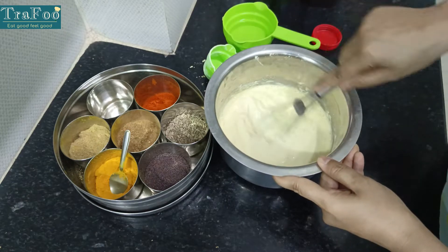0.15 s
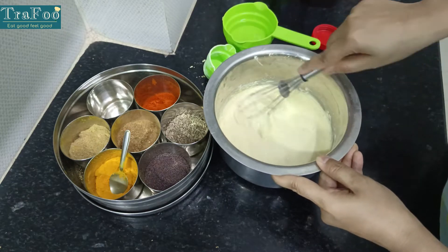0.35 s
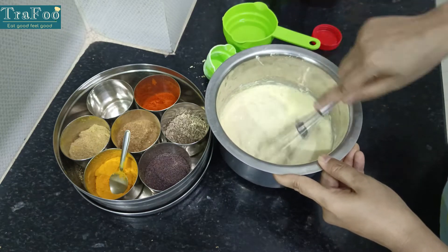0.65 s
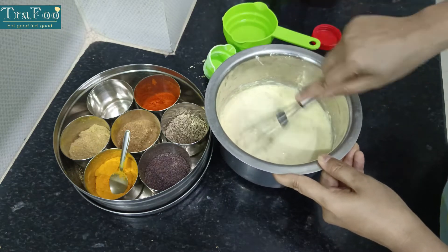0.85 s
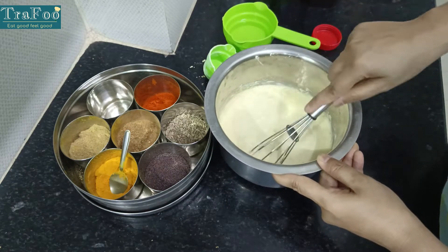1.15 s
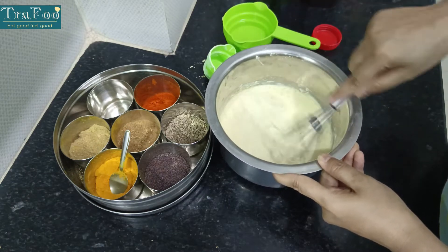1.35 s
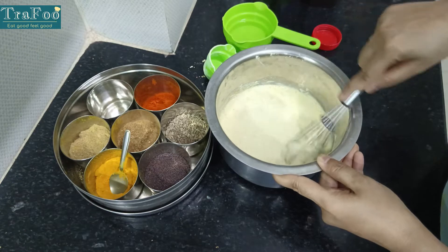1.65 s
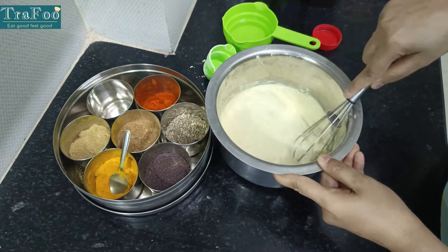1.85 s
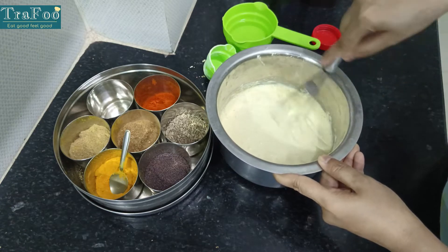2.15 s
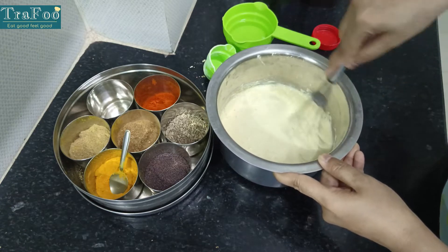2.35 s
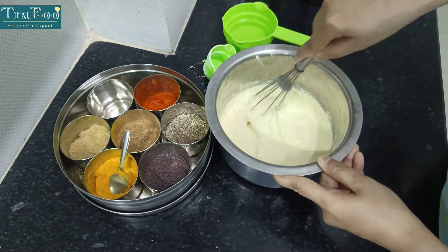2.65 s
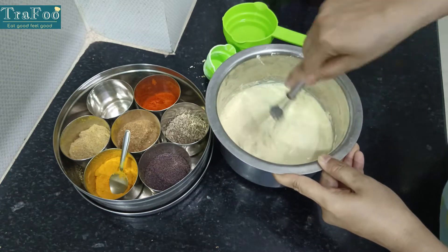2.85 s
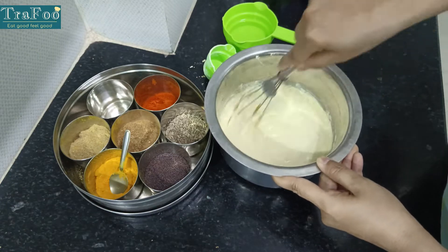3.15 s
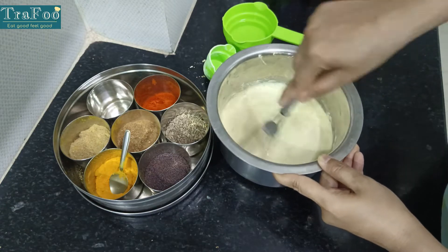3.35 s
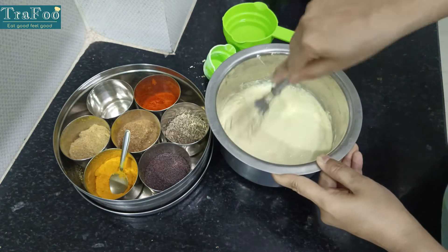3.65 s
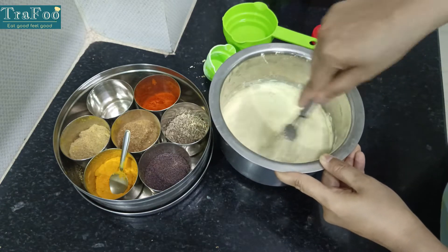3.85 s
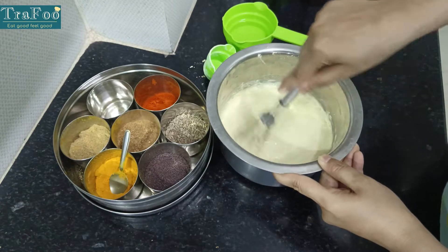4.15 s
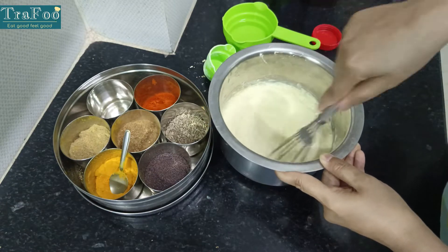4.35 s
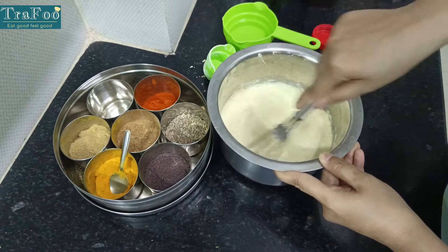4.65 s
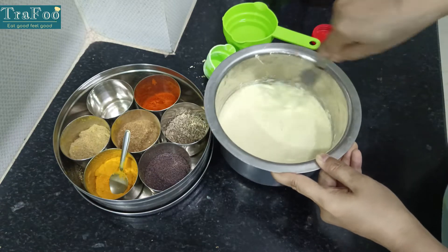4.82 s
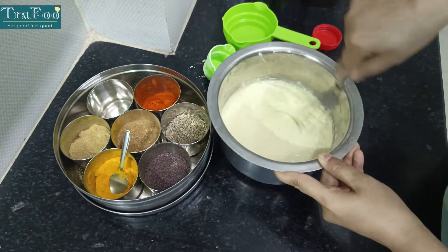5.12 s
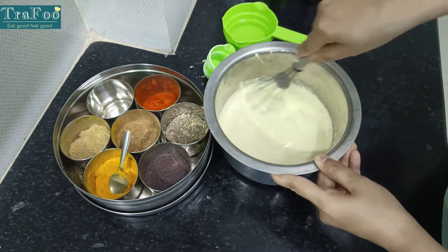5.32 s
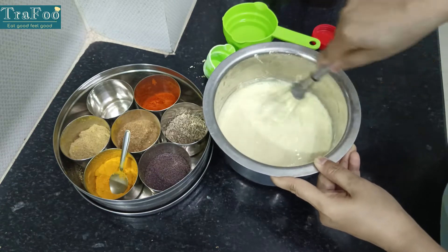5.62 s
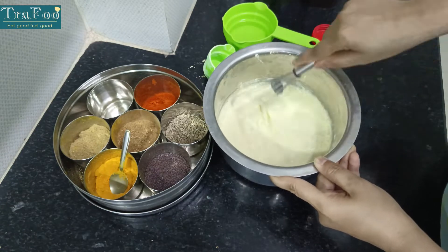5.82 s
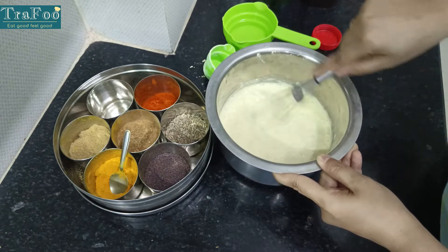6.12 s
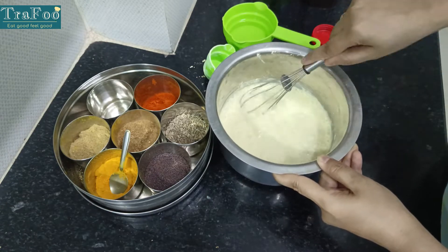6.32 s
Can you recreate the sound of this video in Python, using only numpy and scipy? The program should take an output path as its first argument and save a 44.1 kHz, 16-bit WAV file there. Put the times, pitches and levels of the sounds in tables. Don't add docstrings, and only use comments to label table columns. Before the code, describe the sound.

Close up in a small kitchen, a wire whisk beats batter in a hand-held steel bowl. Quick scraping strokes come several times a second, dotted with short metallic clacks and pings. From about two seconds, wet slaps and low thumps of the rocking bowl join in, and the beating grows firmer and busier through to the end, over very quiet room tone.

```python
import sys
import numpy as np
from scipy import signal
from scipy.fft import rfft, irfft, next_fast_len
from scipy.io import wavfile
from scipy.ndimage import uniform_filter1d, map_coordinates

SR = 44100
rng = np.random.default_rng(int(sys.argv[2]) if len(sys.argv) > 2 else 0)


def voltage_ratio(level):
    return 10 ** (np.asarray(level, float) / 20)


def waveform_to_disk(signal):
    frames = np.transpose(np.atleast_2d(signal))
    scaled = np.clip(frames, -1, 1) * 32767
    samples = np.round(scaled).astype(np.int16)
    wavfile.write(sys.argv[1], SR, samples)


N = 285768

# turn_s, drag_at_turn_db, drag_at_full_speed_db
STROKES = [(0.0, -38.5, -45), (0.072, -62, -43.5), (0.192, -44, -42.5), (0.317, -49.5, -39),
           (0.451, -47, -37), (0.688, -49, -40), (0.79, -58, -33), (0.906, -56, -33),
           (0.966, -42, -39.5), (1.153, -59, -40), (1.242, -55, -40), (1.387, -50, -43.5),
           (1.488, -47, -34.5), (1.652, -70, -43), (1.72, -44, -38.5), (1.879, -71, -41),
           (1.949, -49, -38), (2.106, -49.5, -39), (2.312, -46.5, -38.5), (2.439, -50, -35),
           (2.599, -40, -44), (2.676, -57, -42), (2.768, -38, -31.5), (2.833, -33.5, -40.5),
           (2.929, -68, -40.5), (3.067, -33.5, -39), (3.213, -59, -46),
           (3.332, -35, -46), (3.417, -47, -36.5), (3.48, -48, -39), (3.533, -39, -43.5),
                 (3.724, -60, -36.5), (3.975, -52, -46.5), (4.067, -39, -36.5), (4.179, -48, -39),
                 (4.246, -58, -40), (4.33, -43.5, -37), (4.453, -41, -36.5), (4.59, -43, -39),
                 (4.748, -44, -38.5), (4.909, -40.5, -37.5), (4.958, -39, -41), (5.084, -57, -35.5),
                 (5.193, -36, -41.5), (5.341, -63, -41), (5.418, -43, -38), (5.591, -54, -37.5),
                 (5.731, -51, -38.5), (5.825, -43, -35), (5.991, -61, -43.5), (6.077, -54, -38),
                 (6.212, -58, -39), (6.454, -47.5, -32.5)]
STROKE_DEPTH = [2, 1.5, 1, -1.5, 4.5, -10, 7.5, 7.5, 9.5, -5, 3, 3.75, -6, -7, -12, -5, 1, -0.5, -8, -10, 0,
                3, 3, -3, 3.5, -6, 0.5, 1.5, -22, 0.5, 0, -3, 5, -1, -.75, 3.5, 1, 0.5, 2.5, 6, -8, 1.75, 3,
                9.5, 10, 5.5, 7.5, -6, 3.5, 11.5, -4, 3.5, 3.25]
# time_s, brightness_db (wires out of the batter), fullness_db (pressure on the floor)
GRIP = [(0, 26.5, 5), (.45, 17, 2), (.75, -17.5, 6), (1.3, -0.5, 2), (1.9, -6, 9), (2.5, -8, 19.5),
        (3.0, 1, 22.5), (3.45, 8.5, 25.5), (3.9, -24, 27.5), (4.2, -4, 13.5), (4.7, -8.5, 16),
        (5.2, -15, 14), (5.4, 3, 8), (5.65, -13, -17), (5.9, 19, -2), (6.48, -9, -1)]
# freq_hz, density_db_per_hz
DRAG_SPECTRUM = [(350, -80), (600, -64), (789, -17), (930, -53), (996, -10.5), (1100, -10.5), (1290, 4.5),
                 (2630, 8.5), (3020, 7.5), (3550, 10.5), (5660, 7.5), (6150, -1.5), (15800, -20.5)]
# pitch_hz, level_db, t60_s
SINGING_MODES = [(1300, -1.5, 0.051), (1580, -7, 0.068), (1783, 1.5, 0.055), (2244, -7.5, 0.1),
                 (2446, -3, 0.046), (2710, 1.5, 0.058), (3280, 0, 0.064), (3515, -2.5, 0.05),
                 (3697, -7.5, 0.049), (4395, -1.5, 0.055)]
# freq_hz, t60_s
SHELL_DECAY = [(500, 0.57), (2000, 0.039), (5000, 0.081), (16000, 0.013)]
# start_s, peak_db, bare_rim_db, ring_db
KNOCKS = [(0.526, -23, 7, 2), (0.7217, -21.5, -10, -11), (0.975, -10.5, 1.5, 2.5), (1.4267, -23, -3.5, -7),
          (1.6671, -24, -8.5, 2.5), (1.889, -25.5, -6, -13), (2.152, -24.5, 4.5, 9.5), (2.3362, -41, 8, 14),
          (2.3657, -23, 8, -6), (2.5053, -21.5, -0.5, 9), (2.6083, -28, 3.5, 9), (2.7073, -22.5, -5, -2),
          (2.8416, -24.5, 5, 6.5), (2.9653, -24.5, -4.5, 5.5), (3.0981, -25.5, 6, 6),
          (3.2377, -26.5, -3.5, 8), (3.43, -25, 11.5, 10.5), (3.49, -33, -20, 13),
          (3.7704, -15.5, -12.5, 1), (4.2104, -39.5, 8.5, 11), (4.464, -15.5, 2, 5.5),
          (4.7577, -11.5, -0.5, 3), (4.9211, -15.5, 3, -1), (4.9654, -18, 2.5, 7), (5.1007, -26.5, -4, 2),
          (5.2023, -22, -2.5, 0), (5.3571, -21, -11, 4.5), (5.5377, -26.5, 6.5, 8.5), (6.007, -22, -8, -1),
          (6.2448, -16.5, -13, -1)]
# start_s, peak_db
TOUCHES = [(1.5536, -59), (1.615, -35.5), (2.198, -36), (2.265, -28), (2.562, -37), (2.581, -30),
           (3.292, -23.5), (3.394, -45), (3.6587, -31.5), (3.9998, -28), (4.2563, -30), (5.6106, -21.5),
           (5.935, -33), (6.465, -45)]
# start_s, peak_db
BOUNCES = [
    (2.382, -32.5),
    (4.486, -30.5),
    (4.779, -24.5),
]
# pitch_hz, level_db, t60_s
BOWL_MODES = [(1440, -2.5, 0.013), (2350, -42, 0.075), (2704, -10.5, 0.1), (2680, -11.5, 0.2),
              (3410, -14.5, 0.16), (4440, 2.5, 0.025), (4530, -4, 0.064), (4500, -23, 0.089),
              (4850, -19, 0.04), (5970, -40, 0.21)]
# start_s, level_db, lower_modes_db
RIM_BLOWS = [(0.526, -26.5, -10), (0.975, -28.5, 4), (2.366, -33.5, 11.5), (3.43, -35.5, 6.5),
             (4.465, -28.5, -2.5), (4.758, -28, 2)]
# pitch_hz, level_db, t60_s
RIM_MODES = [(2227, -8.5, 0.11), (2370, -7, 0.16), (2740, -9, 0.18), (4380, -1.5, 0.13), (4580, -6, 0.33),
             (4460, -8.5, 0.41), (4530, -4.5, 0.28), (5500, -27, 0.22)]
# start_s, peak_db, pitch_hz
STRUCK_SPOTS = [(0.091, -33, 1600), (0.5142, -38, 1820), (0.5275, -17, 3050), (0.7226, -23, 1350),
                (0.9736, -16, 2630), (1.4257, -31, 2030), (1.5539, -39, 2770), (1.6152, -29.5, 1423),
                (1.666, -26, 1740), (1.818, -24.5, 2470), (1.8915, -29, 1870), (2.0368, -25, 2500),
                (2.1543, -17, 2356), (2.1969, -28, 1710), (2.3251, -41, 2150), (2.3644, -13.5, 2460),
                (2.4882, -12, 2920), (2.5052, -15, 2840), (2.5606, -25.5, 1476), (2.583, -26, 2320),
                (2.607, -28, 2860), (2.7072, -26, 1427), (2.8429, -24, 1476), (2.868, -28, 1335),
                (2.9662, -30, 3200), (3.0353, -23, 2830), (3.0854, -26, 2900), (3.099, -23, 2710),
                (3.236, -23.5, 1293), (3.2918, -27.5, 1284), (3.392, -27, 1378), (3.4301, -17, 3030),
                (3.4907, -22.5, 1530), (3.6576, -31.5, 2000), (3.7549, -38, 2390), (3.7706, -19, 2810),
                (3.9974, -27.5, 1347), (4.1106, -40, 1310), (4.131, -38, 2700), (4.2113, -32, 1460),
                (4.2565, -28.5, 1590), (4.4097, -26, 2700), (4.466, -17, 1382), (4.5186, -21, 2400),
                (4.7587, -14, 1330), (4.9212, -14.5, 2095), (4.9661, -15, 2280), (5.1012, -20, 1494),
                (5.2021, -25, 1860), (5.3567, -28, 1620), (5.5367, -32, 2680), (5.6076, -24, 1750),
                (5.857, -31, 2090), (5.9339, -31, 2600), (6.0094, -41, 1440), (6.0871, -33, 2560),
                (6.1065, -23.5, 2660), (6.2459, -22, 2680), (6.2928, -35, 1820), (6.4677, -33, 3230),
                (0.0897, -41, 4380), (0.2039, -33, 3400), (0.3546, -31, 3730), (0.4653, -36, 3570),
              (0.4774, -23, 4030), (0.5272, -4.5, 4466), (0.629, -23, 3820), (0.7063, -38, 3600),
              (0.721, -36, 3650), (0.848, -27, 3450), (0.9323, -25, 3650), (0.9733, -15.5, 4380),
              (1.3223, -27, 3270), (1.4247, -26.5, 3640), (1.512, -26, 4040), (1.555, -23, 3470),
              (1.6663, -29, 3630), (1.8954, -25, 3630), (1.9744, -37, 3630), (2.154, -21, 5180),
              (2.268, -22, 3930), (2.336, -21, 3470), (2.3655, -30, 5500), (2.38, -12, 4570),
              (2.4917, -25, 3620), (2.5052, -22, 3530), (2.58, -23, 4510), (2.609, -22.5, 4350),
              (2.708, -25, 3200), (2.7861, -26, 3430), (2.844, -13, 4450), (2.9638, -21, 3280),
              (3.0997, -14, 4640), (3.2365, -23, 3310), (3.4294, -11.5, 4320), (3.7529, -19, 4440),
              (3.7698, -17, 4110), (3.7988, -26, 3870), (4.2108, -23.5, 3630), (4.4656, -11, 4850),
              (4.4855, -10.5, 4440), (4.76, -23, 4400), (4.7778, -14, 4500), (4.9215, -21, 4630),
              (4.9663, -11, 4500), (5.1013, -20, 3360), (5.2028, -24, 4620), (5.358, -25, 3220),
              (5.5395, -15, 3900), (5.6156, -33, 3500), (5.62, -25, 3270), (5.7777, -26, 3630),
              (5.9015, -21.5, 3490), (6.0059, -29, 3250), (6.0925, -25.5, 3960), (6.1125, -27.5, 3870),
              (6.126, -26.5, 3500), (6.245, -24, 3660), (6.2936, -28, 4270), (6.4675, -32, 3250),
                (.722, -25, 2760), (1.195, -34.5, 1200), (1.426, -24.5, 2570), (1.891, -31, 1110),
               (1.98, -36, 1300), (2.092, -30, 1420), (2.265, -41, 1360), (2.455, -32.5, 1500),
               (5.538, -43, 1450), (5.618, -31, 2720), (6.246, -20, 1616)]
# start_s, peak_db, pitch_hz
SLAPS = [(0.288, -38.5, 815), (0.524, -27, 466), (0.722, -38, 593), (0.753, -41, 620), (0.979, -30.5, 603),
         (1.426, -40.5, 567), (1.667, -35, 800), (1.825, -42, 745), (1.89, -44.5, 690), (2.15, -20, 440),
         (2.365, -19, 383), (2.504, -22, 710), (2.58, -29, 415), (2.841, -32.5, 617), (3.047, -26, 790),
         (3.085, -24, 445), (3.237, -37, 600), (3.385, -30.5, 814), (3.435, -33, 460), (3.763, -23.5, 697),
         (4.465, -20.5, 550), (4.756, -18, 729), (4.92, -25.5, 700), (4.966, -19.5, 388), (5.1, -36.5, 650),
         (5.201, -22.5, 697), (5.608, -42, 568), (6.01, -37.5, 560), (6.246, -32, 627), (6.407, -42, 800)]
# start_s, peak_db, pitch_hz
MORE_SLAPS = [(1.0, -46.5, 345), (1.76, -48, 423), (1.77, -42, 169), (4.45, -34.5, 385), (.33, -51, 1140),
              (6.27, -39, 1010), (.9, -43, 1060), (1.18, -47, 1080), (2.156, -21, 870), (2.85, -40, 400),
              (3.25, -44.5, 253), (3.56, -44, 626), (4.07, -43, 590), (2.96, -28.5, 970), (4.06, -41, 1050),
              (5.4, -47, 1010), (2.505, -29, 950), (4.28, -41.5, 698), (4.6, -55, 770), (5.27, -50, 970),
              (5.545, -43, 498)]
# start_s, peak_db, pitch_hz, t60_s
BACKWASH = [(2.188, -32, 389, 0.16), (2.41, -34, 474, 0.19), (4.539, -35, 379, 1),
            (4.923, -30.5, 311, 0.12), (5.224, -28, 391, 0.12)]
# start_s, level_db, held_s
ROCKS = [(1.25, -61.5, 0.099), (1.768, -50, 0.0031), (2.2, -60, 0.066), (2.42, -57, 0.0086),
         (2.54, -47, 0.06), (2.737, -41, 0.0091), (2.889, -43.5, 0.0068), (2.99, -50.5, 0.04),
         (3.12, -45.5, 0.17), (3.41, -50.5, 0.0053), (3.52, -47, 0.016), (3.8, -40.5, 0.026),
         (3.95, -51, 0.017), (4.038, -43.5, 0.0046), (4.2, -44, 0.23), (4.5, -37, 0.02),
         (4.791, -35.5, 0.015), (4.87, -46.5, 0.16), (5.14, -45, 0.0047), (5.23, -47.5, 0.025),
         (5.381, -44.5, 0.018), (5.63, -52, 0.011), (5.77, -52.5, 0.0096), (6.28, -55, 0.022)]
# pitch_hz, width_hz, level_db
COUNTER_MODES = [
    (104.7, 13.3, 3.5),
    (159.7, 33, -13),
    (76, 31, -36),
]
# freq_hz, density_db_per_hz
AIR_SPECTRUM = [(15, -45), (25, -18), (98, -1), (126, -0.5), (244, -15), (425, -13.5), (525, -11),
                (800, -23), (1170, -51), (1980, -120)]
# freq_hz, left_db, right_db
MIC_RESPONSE = [(3000, 0, 0), (5500, -1, .5), (8000, -2, .5), (10500, -5, 2.5), (12500, -23, -2),
                (15800, -24, 1), (16100, -60, -40)]


def rms_one(x):
    return x / np.sqrt(np.mean(x ** 2) + 1e-20)


def at_hz(points, hz):
    point_hz, value = np.transpose(points)
    return np.interp(np.log(hz), np.log(np.maximum(point_hz, 1)), value)


def spectrum_hz(size):
    return np.maximum(np.arange(size // 2 + 1) * SR / size, 1)


def highpass(x, order, hz):
    return signal.sosfilt(signal.butter(order, hz, "high", fs=SR, output="sos"), x)


def place(out, sound, start):
    out[:, start:start + sound.shape[1]] += sound[:, :N - start]


def drift(rate):
    r = np.exp(-80 * np.pi * rate / SR)
    noise = rng.standard_normal(N // 40 + 2002)
    slow = signal.lfilter([1], [1, -2 * r, r * r], noise)[2000:]
    return np.interp(np.arange(N) / 40, np.arange(len(slow)), rms_one(slow))


def ring(force, hz, t60):
    r, w = voltage_ratio(-60 / (t60 * SR)), 2 * np.pi * hz / SR
    return signal.lfilter([0, np.sin(w)], [1, -2 * r * np.cos(w), r * r], force + 1e-18)


def to_mics(sound):
    return np.array([sound, np.roll(sound, rng.choice([-4, -3, -2, 2, 3, 4]))])


def shell_modes(count, size, damping, alike):
    hz, t = spectrum_hz(size), np.arange(size) / SR
    mid, side = rfft(rng.standard_normal((2, count, 1, size)))
    alike = np.clip(alike * 1000 / hz, 0, .9)
    both = np.sqrt(1 + alike) * mid + np.sqrt(1 - alike) * side * [[1], [-1]]
    centres, out = np.geomspace(500, 16000, 7), []
    for k, centre in enumerate(centres):
        band = np.interp(np.log(hz), np.log(centres), np.arange(7) == k)
        t60 = max(at_hz(SHELL_DECAY, centre) * damping, .01)
        out.append(irfft(both * band) * voltage_ratio(-60 * t / t60) / np.sqrt(t60))
    return np.array(out)


def stroke_motion(turn_s, turn_db, full_db):
    wait = np.array(KNOCKS)[:, :1] - turn_s
    rebounds = np.any((wait > 0) & (wait < .04), axis=0)
    crest_s = turn_s + np.diff(turn_s, append=N / SR) * np.where(rebounds, 0.35, 0.42)
    t = np.arange(N) / SR
    swing = np.interp(t, np.ravel([turn_s, crest_s], "F"), np.tile([0, 1], len(turn_s)))
    speed = np.sin(swing * np.pi / 2)
    turn, full = np.interp(t, turn_s, turn_db), np.interp(t, crest_s, full_db)
    return speed, voltage_ratio(turn - 6.5 + (full - turn + 3.5) * speed ** 0.5)


def stroke_colours(turn_s):
    grip_s, bright_db, body_db = np.transpose(GRIP)
    turn_s = (turn_s * SR).astype(int) / SR
    bright_db, body_db = np.interp(turn_s, grip_s, bright_db), np.interp(turn_s, grip_s, body_db)
    colour_db = np.outer([0.69, 0.93, 0.0, 0.068, 0.057, 0.14, 0.0], body_db)
    colour_db += np.outer([0.15, 0.26, 0.24, 0.21, 0.17, 0.22, 0.58], bright_db - 10.0)
    colour_db += np.outer([0.07, 1.0, 1.0, -0.35, 0.14, 0.035, 0.18], STROKE_DEPTH)
    return colour_db + 1.3 * rng.standard_normal((len(turn_s), 7)).T


def drag():
    turn_s, turn_db, full_db = np.transpose(STROKES)
    count = len(turn_s)
    speed, level = stroke_motion(turn_s, turn_db, full_db)
    sizes = voltage_ratio(1.95 * np.minimum(rng.exponential(1, N), 5)) * rng.choice([-1, 1], N)
    slips_per_s = 2600 * voltage_ratio(4.5 * drift(70))
    slips = rms_one(sizes * (rng.random(N) < slips_per_s / SR)) * level

    gains = voltage_ratio(np.tile(stroke_colours(turn_s), 3))[:, :, None, None]
    tracks = shell_modes(count=3 * count, size=2048, damping=0.55, alike=0.15) * gains
    tracks = tracks.sum(axis=0).reshape(3, count, 2, -1)
    groups = rng.integers(0, 3, N)
    out, edges = np.zeros((2, N)), np.append(turn_s * SR, N).astype(int)
    for k, (i, j) in enumerate(zip(edges, edges[1:])):
        for group in range(3):
            force = slips[i:j] * (groups[i:j] == group)
            place(out, signal.fftconvolve(force[None], tracks[group, k], axes=1), i)

    out = rms_one(out) + voltage_ratio(-8.0) * rms_one(singing(slips))
    hz = spectrum_hz(N)
    out = irfft(rfft(out) * voltage_ratio(at_hz(DRAG_SPECTRUM, hz)), N)
    high = irfft(rfft(out) * np.clip(hz / 5000 - 1.2, 0, 1), N)
    out = patches(out - high * .72 * (1 - speed ** 2))
    return out * np.sqrt(np.mean(level ** 2) / np.mean(out ** 2)) * voltage_ratio([[1.2], [2.2]])


def singing(slips):
    out, n = 0, np.arange(N)
    for hz, db, t60 in SINGING_MODES:
        load = drift(4.594)
        sound = ring(slips * voltage_ratio(10.5 * np.tanh(load)), hz, t60 / 2)
        shift = 0.000806 * SR * np.roll(load, N // 2)
        out = out + to_mics(np.interp(n + shift, n, sound)) * voltage_ratio(db)
    return out


def patches(x):
    depth_db, patch_s, patch_octaves = 3, .02, 0.3003
    hz, t, frames = signal.stft(x, SR, nperseg=512)
    octaves = np.log2(np.maximum(hz, 250) / 250)
    at = np.meshgrid(octaves / patch_octaves, t / patch_s, indexing="ij")
    field = map_coordinates(rng.standard_normal((70, 700)), at, order=1, mode="wrap")
    return signal.istft(frames * voltage_ratio(depth_db * field), SR, nperseg=512)[1][:, :N]


def knocks():
    touches = [(s, db, -9, 0) for s, db in TOUCHES]
    bounces = [(s, db, 9, 10) for s, db in BOUNCES]
    s, peak_db, rim_db, ring_db = np.transpose(sorted(KNOCKS + touches + bounces))
    count, start = len(s), (s * SR).astype(int)
    edge_db = -16.5 + 1.66 * rim_db
    pan_db = -1 + 1.5 * rng.standard_normal(count)

    steps = np.arange(round(0.023 * SR))
    chance = rng.random((count, 2 * len(steps)))
    landings = (chance[:, ::2] < .05) * np.sign(chance[:, 1::2] - .5) * np.exp(-steps / SR / 0.00087)
    landings[:, 0] = 0.76
    landings /= np.sqrt(np.sum(landings ** 2, axis=1, keepdims=True))

    slap_s, slap_db, _ = np.transpose(SLAPS)
    wet_db = np.where(np.abs(s[:, None] - slap_s) < .011, slap_db, -53).max(axis=1) - peak_db
    flat = 0 * s
    colour_db = np.array([flat - 40, 0.63 * wet_db - 4.5, flat + 0.2, flat - 1.5,
                          rim_db - 4.5, edge_db - 8.0, edge_db - 58])
    clack = shell_modes(count=count, size=4096, damping=1.1, alike=0.29) * voltage_ratio(colour_db)[:, :, None, None]
    clack = signal.fftconvolve(np.sum(clack, axis=0), landings[:, None], axes=2)
    clack *= voltage_ratio(peak_db - 12.0)[:, None, None]
    dry_edge_hz = 1120
    clack = np.where((wet_db < -11.5)[:, None, None], highpass(clack, 8, dry_edge_hz), clack)
    out = np.zeros((2, N))
    for i, sound in zip(start, clack):
        place(out, sound, i)

    clear = 0
    at = np.minimum(start[:, None] + steps, N - 1)
    spread = rng.standard_normal((count, len(BOWL_MODES)))
    for k, (hz, mode_db, t60) in enumerate(BOWL_MODES):
        bare_db = (.5 * rim_db - 3) * (hz > 3600)
        height_db = peak_db + ring_db + mode_db - 13 + bare_db + 3.0 * spread[:, k]
        force = np.zeros(N)
        np.add.at(force, at, landings * voltage_ratio(height_db)[:, None])
        clear = clear + to_mics(ring(force, hz, np.clip(t60, .03, .3)))

    latest = np.searchsorted(start, np.arange(N), "right") - 1
    lean_db = pan_db[np.clip(latest, 0, None)] * 0.81
    out = highpass(out, 4, 880) + highpass(clear, 8, dry_edge_hz)
    return out * voltage_ratio([lean_db / 2, -lean_db / 2])


def rim():
    s, level_db, low_db = np.transpose(RIM_BLOWS)
    spread, out = rng.standard_normal((len(s), len(RIM_MODES))), 0
    for k, (hz, db, t60) in enumerate(RIM_MODES):
        force = np.zeros(N)
        force[(s * SR).astype(int)] = voltage_ratio(level_db + db + low_db * (hz < 3600) + 2 * spread[:, k])
        out = out + to_mics(ring(force, hz, t60))
    return highpass(out, 4, 1500) * voltage_ratio([[-1.5], [1.5]])


def spots():
    detune, ring_cycles, rattle, rattle_s = .035, 85.0, .25, .0035
    rows = STRUCK_SPOTS
    out, t = np.zeros((2, N)), np.arange(round(.12 * SR)) / SR
    noises = rng.standard_normal((len(rows), len(t)))
    blends = rng.uniform(-1.16, 1, (len(rows), 2, 2))
    for (s, peak_db, hz), noise, blend in zip(rows, noises, blends):
        force = rattle * noise * np.exp(-t / rattle_s) + (t == 0)
        low, mid, high = (ring(force, hz * (1 + k * detune), ring_cycles / hz) for k in (-1, 0, 1))
        sound = mid * [[1], [blend[0, 0] * 0.38 + 0.54]]
        sound = sound + blend[0][:, None] * low + blend[1][:, None] * high
        wait = np.array(KNOCKS)[:, 0] - s
        graze_db = -12 * np.any((wait > .006) & (wait < .022))
        place(out, voltage_ratio(peak_db - 6 + graze_db) * sound / np.max(np.abs(sound)), round(s * SR))
    return highpass(out, 8, 1100) * voltage_ratio([[-.8], [.8]])


def slaps():
    out, t = np.zeros((2, N)), np.arange(round(.25 * SR)) / SR
    rows = [(s, db, hz, 0.35 * hz / 1000) for s, db, hz in SLAPS + MORE_SLAPS] + BACKWASH
    for (s, peak_db, hz, t60), (mid, side) in zip(rows, rng.standard_normal((len(rows), 2, len(t)))):
        rumble = (1 - np.exp(-t / 0.00008)) * voltage_ratio(-60 * t / t60)
        push = (mid + hz / 1050 * side * [[1], [-1]]) * rumble
        partials = [(1, 2), (rng.uniform(1.094, 1.457), -1.5), (rng.uniform(1.47, 2.1), -3)]
        hollow = 0
        for ratio, db in partials:
            once = ring(push, hz * ratio, 16.0 / hz)
            hollow = hollow + voltage_ratio(db) * ring(once, hz * ratio, 14.3 / hz) / ratio ** 2
        hollow = np.array([np.interp(t + .9 * t ** 2, t, ear, right=0) for ear in hollow])
        level_db = peak_db - 13.0 + np.log2(520 / hz) * np.array([[2], [-2]])
        place(out, voltage_ratio(level_db) * hollow / np.max(np.abs(hollow)), round(s * SR))
    return out


def rocking():
    push, out = highpass(rng.standard_normal(N), 2, 70), 0
    for hz, width_hz, db in COUNTER_MODES:
        t60 = np.log(1000) / np.pi / width_hz
        out = out + voltage_ratio(db) * rms_one(ring(ring(push, hz, t60), hz, t60 / 2))
    even = out / np.sqrt(uniform_filter1d(out ** 2, 3000) + .15)
    return highpass(rms_one(even) * rock_level(), 2, 75) * voltage_ratio([[-1.1], [.9]])


def rock_level():
    rise_db_per_s, fall_db_per_s, rest_db = 428, 293, -73
    t, (s, level_db, held_s) = np.arange(0, N, 32)[:, None] / SR, np.transpose(ROCKS)
    before, after = np.maximum(s - t, 0), np.maximum(t - s - held_s, 0)
    db = (level_db - rise_db_per_s * before - fall_db_per_s * after).max(axis=1)
    return voltage_ratio(np.interp(np.arange(N) / SR, t[:, 0], np.maximum(db, rest_db)))


def kitchen(x):
    t60_s, wall_cut_hz = 0.47, 23000
    size = next_fast_len(N + SR)
    phase = -2j * np.pi * np.arange(size // 2 + 1) / size
    dull = np.exp(-2 * np.pi * wall_cut_hz / SR)
    wall = (1 - dull) / (1 - dull * np.exp(phase))
    out = np.zeros((2, len(phase)), complex)
    for k, lag in enumerate((rng.uniform(0.0066, .03, 16) * SR).astype(int)):
        loop = voltage_ratio(-60 * lag / SR / t60_s) * wall * np.exp(lag * phase)
        out[k % 2] += loop / (1 - loop) * (-1) ** (k // 2)
    return irfft(out * rfft(x.mean(axis=0), size), size)[:, :N]


def air():
    hz = spectrum_hz(N)
    widths = [hz ** 0, np.clip(hz / 600, .4, 1)]
    noise = rfft(rng.standard_normal((2, N))) * voltage_ratio(at_hz(AIR_SPECTRUM, hz))
    mid, side = irfft(noise * widths, N)
    return voltage_ratio(-71) * rms_one(mid + side * [[1], [-1]])


def scene():
    bowl = drag() + knocks() + rim() + slaps()
    return bowl + spots() + rocking() + voltage_ratio(-18.5) * kitchen(bowl) + air()


def top_cut(x):
    return signal.sosfilt(signal.butter(12, 16790, fs=SR, output="sos"), x)


def record(dry):
    peak_top = 0.96
    rounded = peak_top * np.tanh(dry / peak_top)
    hz, (points, *ports) = np.arange(N // 2 + 1) * SR / N, np.transpose(MIC_RESPONSE)
    response = voltage_ratio([np.interp(hz, points, db) for db in ports])
    mix = irfft(rfft(rounded) * response, N)
    return top_cut(mix)


dry = scene()
out = record(dry)
waveform_to_disk(out)
```